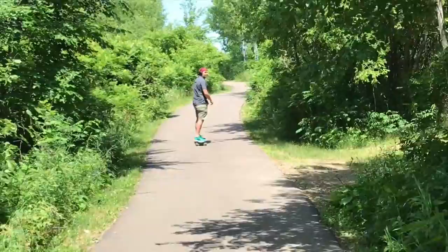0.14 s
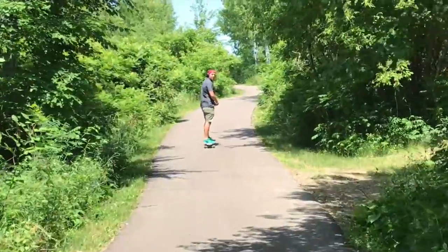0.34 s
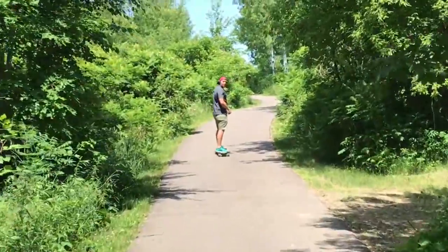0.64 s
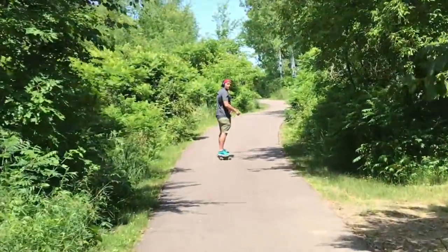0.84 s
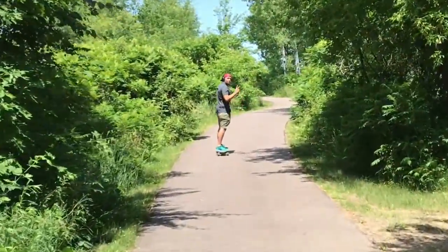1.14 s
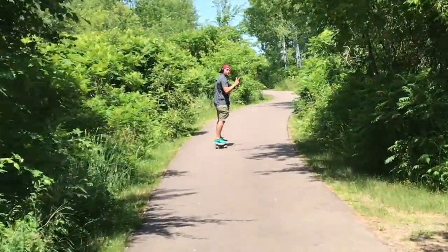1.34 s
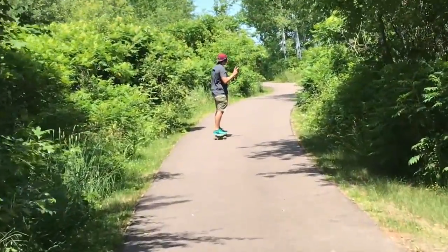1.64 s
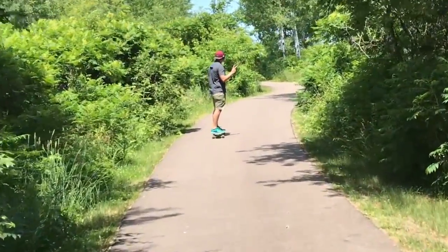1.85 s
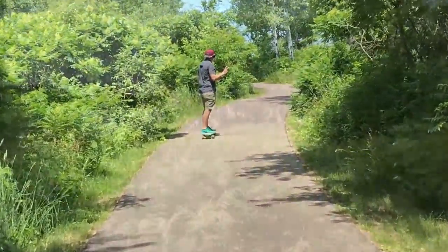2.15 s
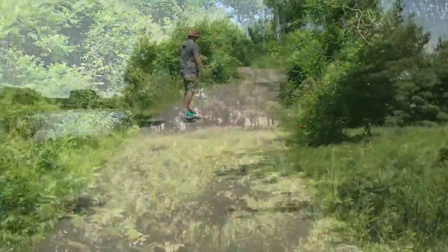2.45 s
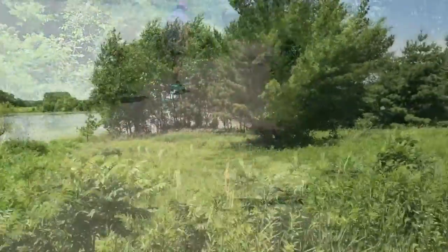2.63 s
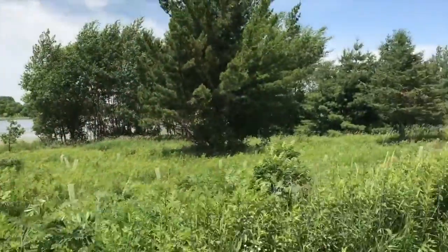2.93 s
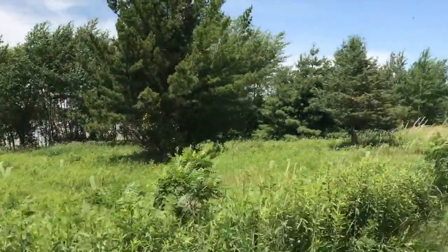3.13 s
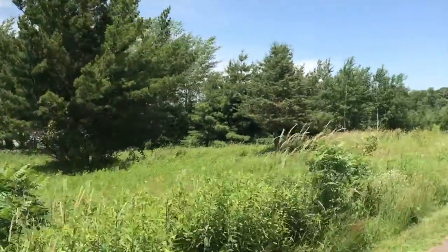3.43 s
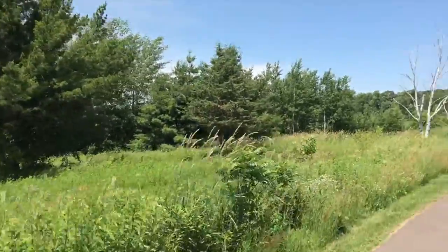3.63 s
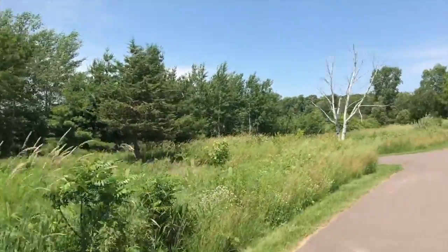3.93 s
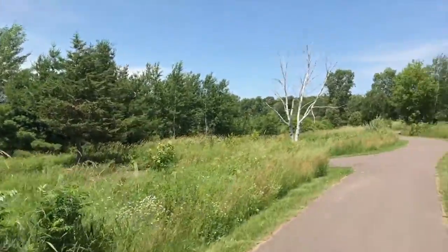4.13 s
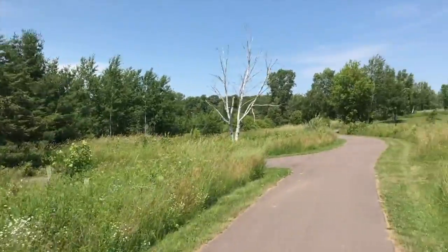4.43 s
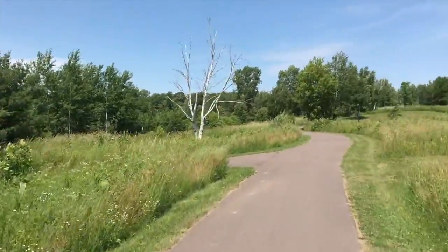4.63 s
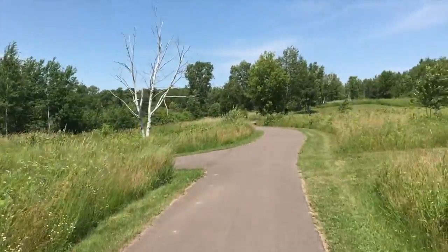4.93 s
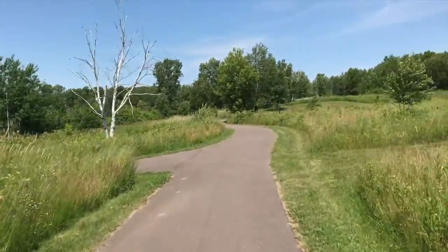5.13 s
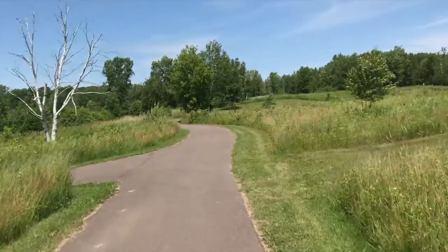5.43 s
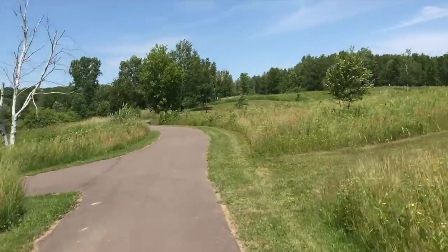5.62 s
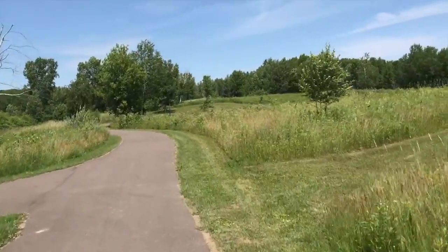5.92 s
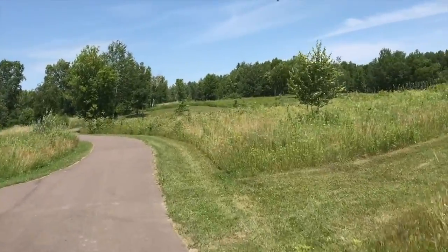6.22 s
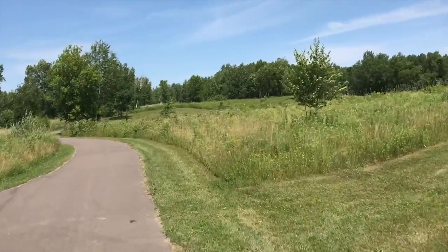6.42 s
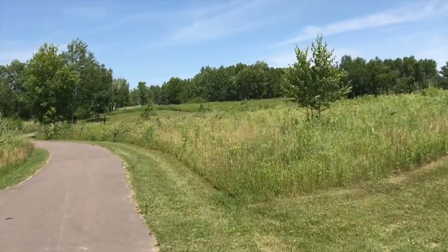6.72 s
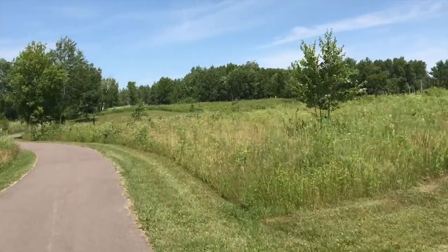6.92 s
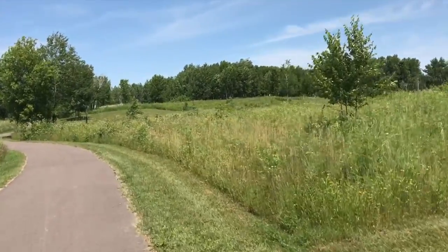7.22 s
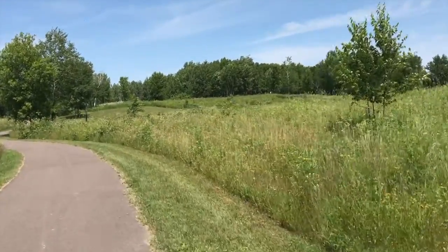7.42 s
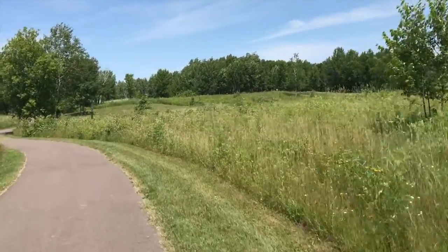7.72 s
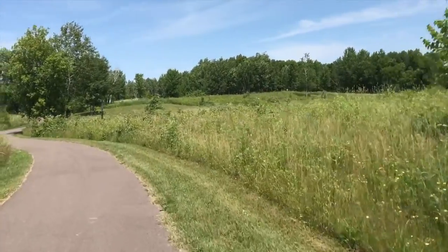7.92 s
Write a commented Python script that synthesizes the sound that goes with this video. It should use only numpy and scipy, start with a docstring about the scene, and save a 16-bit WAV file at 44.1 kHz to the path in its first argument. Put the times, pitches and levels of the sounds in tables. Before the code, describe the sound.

Close handheld microphone over a rolling longboard in an open park. Strong woody rumble and low wind flutter come first, with small dull knocks. The roll then softens, wind breaks into short puffs and fades, and small birds whistle and trill high and faint. A sharp double knock around the middle leads into crunching grit, then calm steady rolling.

```python
"""An asphalt park path, heard from the hand of a rider rolling along it on a longboard.
Forced vibration: the rough road drums on the resonant deck, and both axles knock over a crack.
Fracture and turbulence: grit crackles under the wheels; wind buffets the microphone, mostly early on.
Frequency modulation: small birds in the meadow twitter in gliding near-sine notes with echoes."""
import sys
import numpy as np
from scipy import signal
from scipy.fft import rfft, irfft
from scipy.io import wavfile

SR = 44100
rng = np.random.default_rng(int(sys.argv[2]) if len(sys.argv) > 2 else 0)


def inscribe(sig):
    """Save sig as 16-bit PCM at rate SR to the path in sys.argv[1].

    A 1-D sig is mono; a 2-D sig holds one channel per row.
    Samples are clipped to [-1, 1] before scaling.
    """
    pcm = np.round(np.clip(np.atleast_2d(sig).T, -1, 1) * 32767)
    wavfile.write(sys.argv[1], SR, pcm.astype(np.int16))


N = 355534  # length [samples]


def from_db(db):
    """Logarithmic level: decibels to amplitude gain."""
    return 10 ** (np.asarray(db) / 20)


def rms_one(x):
    """Normalization: scale to unit rms."""
    return x / np.sqrt(np.mean(x ** 2) + 1e-20)


def in_time(rows):
    """Linear interpolation: each column of a curve at every sample."""
    s, *columns = np.transpose(rows)
    return [np.interp(np.arange(N) / SR, s, column) for column in columns]


def drift(rate_hz):
    """Low-pass random process: slow fluctuation of rms 1."""
    hz = np.arange(N // 2 + 1) * SR / N
    spectrum = rfft(rng.standard_normal(N)) / (1 + (hz / rate_hz) ** 2)
    return rms_one(irfft(spectrum, N))


def noise(colour):
    """Spectral shaping: white noise weighted along log frequency, rms 1."""
    hz, level_db = np.transpose(colour)
    bins = np.arange(1, N // 2 + 2) * SR / N
    weight = from_db(np.interp(np.log(bins), np.log(hz), level_db))
    return rms_one(irfft(rfft(rng.standard_normal(N)) * weight, N))


def resonate(x, hz, width):
    """Damped resonance: a two-pole band-pass with gain 1 at its peak."""
    r = np.exp(-np.pi * width / SR)
    feedback = [1, -2 * r * np.cos(2 * np.pi * hz / SR), r * r]
    return signal.lfilter(np.array([1, 0, -1]) * (1 - r * r) / 2, feedback, x + 1e-18)


def ring(clicks, hz, t60):
    """Impulse response: a unit click starts a decaying sine of initial height 1."""
    r, w = np.exp(-np.log(1000) / (t60 * SR)), 2 * np.pi * hz / SR
    return signal.lfilter([0, np.sin(w)], [1, -2 * r * np.cos(w), r * r], clicks + 1e-18)


def clicks_at(times, sizes):
    """Impulsive excitation: single impulses at given moments."""
    return np.bincount((np.asarray(times) * SR).astype(int), sizes, N)[:N]


def grains(per_s, spread_db):
    """Shot noise: random impulses, many small and a few large; rms 1."""
    height_db = spread_db * np.minimum(rng.exponential(1, N), 4)
    sizes = from_db(height_db) * rng.choice([-1, 1], N)
    return rms_one(sizes * (rng.random(N) < per_s / SR))


def scatter(x, decay_s):
    """Diffuse response: each impulse spreads into a dense, dying cluster of the same energy."""
    age = np.arange(SR // 4) / SR
    cluster = rng.standard_normal(len(age)) * np.exp(-age / decay_s)
    return signal.fftconvolve(x, cluster / np.linalg.norm(cluster))[:N]


def swell(middle_s, length_s):
    """Amplitude envelope: a cosine-squared rise and fall of height 1."""
    return np.cos(np.pi * np.clip((np.arange(N) / SR - middle_s) / length_s, -.5, .5)) ** 2


def swells(rows):
    """Superposition: the summed gain of a row of passing swells."""
    return sum(from_db(db) * swell(s, length) for s, length, db in rows)


# the ride: (time [s], relative deck rumble [dB], relative low bending of the deck [dB])
RIDE_LEVELS = [(0, -36, -52), (1.1, -36, -34), (1.7, -37, -37.5), (2.1, -35.5, -34.5), (2.4, -40.5, -43),
               (2.65, -43.5, -39.5), (2.9, -46, -43), (3.5, -46, -48.5), (4.1, -43, -40.5),
               (4.6, -43.5, -41.5), (5.3, -44.5, -38), (6.1, -45.5, -43), (6.7, -45.5, -41),
               (8.06, -45, -41.5)]


def ride():
    """Varying excitation: deck rumble and low bending levels along the path."""
    return in_time(RIDE_LEVELS)


def drum(modes):
    """Forced vibration: stones in the asphalt keep a set of resonances ringing."""
    drumming = np.zeros(N)
    for hz, width, db in modes:
        stones = grains(per_s=1800, spread_db=2.0)
        drumming += from_db(db) * rms_one(resonate(resonate(stones, hz, width), hz, width))
    return drumming


# resonances of deck and wheels: (frequency [Hz], width of each filter pass [Hz], relative level [dB])
DECK_MODES = [(494, 100, -5.5), (585, 140, -8), (746, 88, -20), (934, 423, -12), (1115, 300, -20)]
# low bending of the deck: (frequency [Hz], width of each filter pass [Hz], relative level [dB])
LOW_BENDING_MODES = [(159, 40, -7), (202.4, 90, -2), (277, 92, -3), (325.3, 47, -10)]
# sizzle of the tread: (frequency [Hz], relative density [dB per Hz])
TREAD_SPECTRUM = [(700, -26), (1250, -2.5), (1800, -8), (3000, -5), (4500, -10.5), (7000, -8),
                  (10000, -20.5)]
TREAD_DB = -20.5  # against the deck rumble


def rolling(deck_db, bending_db):
    """Modal excitation: the road drums on the deck and the tread sizzles; rough patches shake all of it."""
    patches = from_db(2.5 + 1.4 * drift(30))
    upper = drum(DECK_MODES) + from_db(TREAD_DB) * noise(TREAD_SPECTRUM)
    bending = from_db(bending_db) * drum(LOW_BENDING_MODES)
    return patches * (bending + from_db(deck_db) * upper)


# patches of sand under the wheels: (middle [s], length [s], relative level [dB])
SAND_PATCHES = [(1.09, 0.095, -53), (1.98, 0.4, -61), (3.44, 0.23, -80), (4.22, 0.62, -62),
                (4.72, 0.21, -53), (4.87, .22, -53.5), (5.01, 0.15, -54), (5.22, 0.27, -52.5),
                (5.34, 0.19, -54), (5.5, 0.42, -57.5), (7.25, 0.52, -65), (7.65, 0.076, -58),
                (8.03, 1, -65)]


def loose_sand():
    """Varying excitation: gain of the loose sand passing under the wheels."""
    return swells(SAND_PATCHES)


# smooth hiss: (frequency [Hz], relative density [dB per Hz])
HISS_SPECTRUM = [(600, -14), (1300, 1.5), (1700, 8.5), (2300, 10), (3000, 5.5), (4000, 9), (5000, 5),
                 (6500, 3.5), (9000, -2), (10450, -5), (11300, -3), (14500, -11), (16000, -20)]
# level at cruising rumble, its share of the rumble's swing in dB, hiss of sand against the sand gain
HISS_DB, HISS_FOLLOWS, SAND_HISS_DB = -58, 0.21, -4.5


def hiss(effort_db, sand):
    """Broadband friction: tyre and leaf hiss grows with the rumble; loose sand adds a little power."""
    clean_path = from_db(HISS_DB + HISS_FOLLOWS * effort_db)
    return np.hypot(clean_path, from_db(SAND_HISS_DB) * sand) * noise(HISS_SPECTRUM)


# ring of a grain: (frequency [Hz], width before damping [Hz], relative level [dB])
GRAIN_MODES = [(5960, 1900, 0), (7980, 570, 4.5), (8900, 1160, -3), (11440, 700, -5), (12940, 620, 1),
               (14200, 690, -1.5), (15800, 800, -3.5)]


def grain_ring(clicks, damping=1):
    """Damped resonance: the short, bright ring of crushed grit; damping widens its modes."""
    bright = sum(from_db(db) * resonate(clicks, hz, width * damping) for hz, width, db in GRAIN_MODES)
    return signal.sosfilt(signal.butter(4, 5600, "high", fs=SR, output="sos"), bright)


# larger grains of grit snapping: (time [s], relative strength [dB])
GRAIN_SNAPS = [(0.269, -16.5), (1.134, -20), (1.468, -19), (1.6317, -21), (2.42, -19.5), (2.993, -20.5),
               (3.032, -23), (3.16, -28), (3.389, -25), (3.4, -24), (3.426, -22), (3.473, -23),
               (3.568, -20.5), (4.085, -19), (4.21, -21), (4.2368, -17), (4.274, -23), (4.342, -17),
               (4.37, -25), (4.6474, -18), (4.8135, -22), (4.842, -13.5), (4.8855, -16), (4.92, -17.5),
               (4.9716, -18.5), (5.019, -16), (5.043, -17), (5.1014, -16), (5.191, -18.5), (5.48, -18),
               (5.9626, -21), (6.351, -21), (7.0953, -19.5), (7.15, -24), (7.277, -19.5), (7.634, -26),
               (7.666, -16.5), (8.0092, -18.5)]
GRIT_DB, GRIT_FOLLOWS = -64.5, 0.43  # gain at cruising rumble, share of the rumble's swing in dB
SAND_CLUMP_DB = -7  # how much of the loose sand is crushed in clumps


def grit(effort_db, sand_gain, bed_db=-5, fine_db=-2, crumble_db=-4):
    """Brittle fracture: grit crackles in clumps, sand fizzes finely, large grains and crack edges snap."""
    # each clump is crushed at once and crumbles away, over a bed of fine dust
    blows = np.abs(grains(per_s=120, spread_db=2.8))
    crush = signal.lfilter([1], [1, -np.exp(-1 / (.003 * SR))], blows)  # 3 ms decay
    clumps = rms_one(grain_ring(grains(per_s=2500, spread_db=4.0) * crush, damping=1.3))
    dust = rms_one(grain_ring(grains(per_s=2800, spread_db=1.5), damping=2.7))
    fine = rms_one(grain_ring(grains(per_s=2700, spread_db=6.5)))
    sand = from_db(fine_db) * fine + from_db(SAND_CLUMP_DB) * clumps
    s, snap_db = np.transpose(GRAIN_SNAPS)
    snaps = clicks_at(s, from_db(snap_db - 3.0))
    crumbs = from_db(crumble_db) * scatter(snaps, decay_s=0.0061)
    knock_s, knock_db, edge_db, _ = wheel_strikes()
    edges = scatter(clicks_at(knock_s, from_db(knock_db + edge_db - 3.0)), decay_s=0.012)
    road_gain = from_db(GRIT_DB + GRIT_FOLLOWS * effort_db)
    crackle = road_gain * (clumps + from_db(bed_db) * dust) + sand_gain * sand
    return crackle + grain_ring(snaps + crumbs + edges, damping=0.97)


# steady air stream on the microphone: (time [s], deep rumble [dB], flutter [dB])
AIR_STREAM = [(0, -27, -26), (1.3, -28, -30.5), (1.9, -33, -29.5), (2.5, -32.5, -27.5), (3.0, -45, -27),
              (3.3, -40, -30), (3.55, -28, -26.5), (3.7, -38.5, -45), (3.9, -48.5, -50), (4.4, -39, -77),
              (5.3, -51.5, -55), (6.1, -44.5, -66), (8.06, -52, -46.5)]
# gusts on top of it: (middle [s], length [s], level [dB])
GUST_SWELLS = [(1.1, 0.39, -42), (2.12, 0.17, -21.5), (5.02, 0.3, -39.5)]
# deep rumble: (frequency [Hz], relative density [dB per Hz])
RUMBLE_SPECTRUM = [(15, -40), (28, 4), (42, -0.5), (60, 5), (80, 1.5), (110, -5.5), (200, -79), (500, -56),
                   (1200, -81)]
# quicker flutter: (frequency [Hz], relative density [dB per Hz])
FLUTTER_SPECTRUM = [(30, -54), (55, 0), (82, 1), (125, 2), (190, -7), (290, -7), (420, -15), (600, -21.5),
                    (900, -50), (2000, -79)]
# strongest eddies: (middle [s], length [s], mean pitch before swirl [Hz], glide [octaves], peak level [dB])
EDDIES = [(.951, 0.023, 101, 0, -13.5), (1.026, 0.009, 213, -0.62, -9), (1.045, 0.071, 69, -0.013, -17.5),
          (1.083, 0.024, 83, 0.048, -14.5), (1.156, 0.025, 84, -0.074, -16), (2.773, 0.023, 166, 0.31, -18),
          (2.869, 0.028, 115, -0.029, -16.5), (3.02, 0.047, 112, 0.18, -17), (3.042, .05, 184, 0.53, -18.5),
          (3.086, .05, 218, 0.041, -24), (3.136, 0.037, 114, 0.21, -21), (3.18, .04, 181.5, -0.47, -16.5),
          (3.198, .03, 123, -0.19, -18.5), (3.356, 0.027, 130, -0.4, -18), (3.412, .018, 139, -0.43, -13),
          (3.453, .03, 284, -0.16, -21), (3.522, 0.028, 127, 0.12, -19.5), (3.542, 0.06, 66, 0, -24),
          (3.549, 0.021, 258, 0.31, -18.5), (3.719, 0.017, 141, 0.24, -18), (3.819, .04, 182.4, -0.12, -26),
          (4.605, 0.064, 61, 0.12, -28), (4.728, 0.068, 157, -0.25, -28.5), (4.795, 0.055, 73, 0.075, -25)]
GUST_FLUTTER_DB = -21  # flutter in a gust, against its rumble


def wind():
    """Turbulent pressure: eddies rumble and flutter, rise in gusts, and buffet in a few swings each."""
    rumble_db, flutter_db = in_time(AIR_STREAM)
    gusts = swells(GUST_SWELLS)
    rumble = np.hypot(from_db(rumble_db), gusts) * noise(RUMBLE_SPECTRUM)
    unsteady = rms_one(noise(FLUTTER_SPECTRUM) * from_db(2.0 * drift(21)))
    flutter = np.hypot(from_db(flutter_db), from_db(GUST_FLUTTER_DB) * gusts) * unsteady
    buffets, swirl = np.zeros(N), drift(115)
    for s, length, hz, glide, db in EDDIES:
        at = int((s - length / 2) * SR) + np.arange(int(length * SR))
        octaves = glide * np.linspace(-.5, .5, len(at)) + 0.36 * swirl[at]
        turns = np.cumsum(hz * 2 ** octaves) / SR + rng.random()
        buffets[at] += from_db(db) * np.hanning(len(at)) * np.sin(2 * np.pi * turns)
    return rumble + flutter + buffets


# an axle crosses a crack or bump: (time [s], relative strength [dB], sharp edge [dB], low thump [dB],
# lag of its other wheel [s], that wheel against the first [dB])
AXLE_KNOCKS = [(0.077, -21.5, -9, 2, 0.0075, -5), (.443, -37, -25, 0, 0.0089, -12),
               (.594, -24.5, -27, 15.5, 0.0078, -14), (.971, -24, -25, -4, 0.0091, -18),
               (1.011, -18, -28, 1.5, .006, -23), (1.095, -20, -12, -9, .006, -12),
               (1.217, -32, -20, -9, 0.014, -1), (2.77, -38, -25, 16, .008, -5),
               (3.068, -35, -28, 0, .008, -10), (3.405, -27.5, -20, 0, .008, -16),
               (3.637, -36, -25, -7, .008, -12), (3.757, -26, -25, 4, 0.0075, -4),
               (4.5183, -4, 0.5, 1, .012, -6.5), (4.6894, -10.5, -15, 3, 0.0067, -3.5),
               (5.531, -31, -25, 2, 0.01, -2), (6.228, -32, -28, -1, 0.011, -4),
               (6.351, -30.5, -15, -2, 0.0095, -4)]


def wheel_strikes():
    """Successive impacts: both wheels of an axle meet the crack; times, dB, edge dB, thump dB."""
    s, db, edge_db, thump_db, lag, other_db = np.transpose(AXLE_KNOCKS)
    return np.r_[s, s + lag], np.r_[db, db + other_db], np.tile(edge_db, 2), np.tile(thump_db, 2)


# ring of the struck board: (frequency [Hz], relative level [dB], decay time T60 [s])
BOARD_MODES = [(138, -13, 0.16), (212, -9, 0.35), (342, -0.5, 0.05), (438, -9.5, 0.15), (522, -2.5, 0.1),
               (603, -5, 0.095), (712, -6.5, 0.1), (902, -8.5, 0.06), (1013, -0.5, 0.029),
               (1225, -5.5, 0.011), (1964, -29.5, 0.017), (2190, -23, 0.025), (2550, -25, 0.0027),
               (3130, -16.5, 0.015)]
# chatter of the loose trucks: (frequency [Hz], width of each filter pass [Hz], relative level [dB])
TRUCK_MODES = [(318, 220, 22.5), (540, 410, 9), (938, 680, 14.5), (2030, 1100, 8)]
RATTLE_S, THUMP_BELOW_HZ = 0.011, 400  # decay of the chatter's excitation; thump acts on lower modes


def knocks(uneven_db=2, board_db=-11.0):
    """Modal impact: each wheel strikes every mode unequally; trucks and bearings rattle on briefly."""
    s, level_db, _, thump_db = wheel_strikes()

    def blows(hz, db):
        """Impulsive excitation: the blows as one mode receives them."""
        uneven = uneven_db * rng.standard_normal(len(s))
        return clicks_at(s, from_db(level_db + db + thump_db * (hz < THUMP_BELOW_HZ) + uneven))

    board, rattle = np.zeros(N), np.zeros(N)
    for k, (hz, db, t60) in enumerate(BOARD_MODES):
        board += ring(blows(hz, db), hz, t60) * (-1) ** k  # neighbouring modes in opposite phase
    for hz, width, db in TRUCK_MODES:
        chatter = scatter(blows(hz, db), RATTLE_S)
        rattle += resonate(resonate(chatter, hz, width), hz, width)
    return from_db(board_db) * board + rattle


# short sliding chips, most of them falling:
# (start [s], length [s], middle pitch [Hz], slide [Hz], relative level [dB])
CHIP_NOTES = [(1.836, 0.024, 4150, -700, -45), (1.921, 0.028, 3980, 300, -47),
              (2.021, .011, 4550, -500, -45), (2.028, 0.015, 3950, -150, -41),
              (2.11, 0.018, 3960, 200, -47), (2.202, 0.02, 4600, -100, -44), (2.21, .015, 4000, -600, -46),
              (2.302, 0.016, 4000, 300, -46), (2.432, .016, 5200, -400, -47),
              (2.829, .011, 4640, -600, -46), (2.843, .02, 4660, -550, -38), (2.863, .01, 3850, -600, -46),
              (2.886, 0.013, 4550, 300, -42), (2.898, 0.013, 4580, -600, -37),
              (2.911, .012, 3850, -450, -44), (3.92, .02, 4280, 1000, -48), (4.002, 0.028, 3700, 0, -43),
              (4.579, 0.015, 4130, 600, -37.5), (4.985, .02, 3430, -100, -49),
              (5.938, .024, 4450, -400, -48), (6, .024, 4350, -700, -45), (6.058, .013, 3820, -550, -41.5),
              (6.122, 0.012, 3880, -650, -40), (6.645, .016, 4070, -600, -47),
              (7.242, .014, 4200, -700, -43), (7.274, .01, 4250, -500, -43), (7.286, .016, 4700, -800, -48),
              (7.3, .015, 4220, -1000, -41)]


def chips():
    """Linear frequency sweep: sliding chips, each as (s, pitch contour, gain)."""
    for s, length, hz, slide, db in CHIP_NOTES:
        yield s, hz + slide * np.linspace(-.5, .5, int(length * SR)), from_db(db)


# arched whistles: (start [s], length [s], starting pitch [Hz], top pitch [Hz], end pitch [Hz],
# relative level [dB], fade from start to end [dB])
WHISTLE_NOTES = [(2.97, 0.03, 4440, 4700, 4180, -42, 0), (3.102, .055, 5030, 5200, 5000, -53, -3),
                 (3.426, 0.06, 4500, 4750, 4370, -43, 2), (4.107, 0.083, 4080, 4840, 3400, -38, -6),
                 (4.26, .089, 3990, 4790, 3350, -36.5, -4), (4.484, 0.052, 3200, 3570, 3270, -46, 0),
                 (4.77, .088, 4070, 4620, 3480, -43, -7), (4.915, .074, 4020, 4700, 3580, -42, -7),
                 (5.128, 0.065, 3350, 3550, 3350, -53, -2)]
# when the rise starts, peaks and flattens out, as shares of the length
WHISTLE_RISE, WHISTLE_TOP, WHISTLE_TAIL = 0.097, 0.55, 0.96
WHISTLE_TOP_DB = -13  # the voice thins on the very top of an arch


def whistles():
    """Frequency modulation: pitch arches up and back, each note as (s, pitch contour, gain)."""
    for s, length, start, top, end, db, fade_db in WHISTLE_NOTES:
        along = np.linspace(0, 1, int(length * SR))
        phase = np.interp(along, [WHISTLE_RISE, WHISTLE_TOP, WHISTLE_TAIL], [0, .5, 1])
        arch = np.sin(np.pi * phase) ** 2
        foot = np.where(along < WHISTLE_TOP, start, end)
        level_db = db + WHISTLE_TOP_DB * arch ** 10 + fade_db * (along - .5)
        yield s, foot + (top - foot) * arch, from_db(level_db)


# buzzy trills: (start [s], length [s], time from stroke to stroke [s], mean pitch [Hz], relative level [dB])
TRILL_NOTES = [(3.277, 0.045, .0115, 4170, -45.5), (3.343, .034, .0135, 4010, -46),
               (3.976, .021, .014, 4400, -45), (4.023, .045, 0.012, 4200, -41.5),
               (4.192, .037, .015, 4150, -46), (4.57, .052, .015, 4170, -43.5),
               (4.642, .042, .012, 4040, -41), (5.232, 0.039, 0.013, 4150, -51),
               (5.303, .029, 0.0094, 4100, -46.5), (5.358, .042, .012, 3980, -45),
               (5.426, .046, 0.0127, 3900, -44.5), (6.029, 0.058, .0135, 3960, -47),
               (6.104, 0.053, .011, 3950, -50), (6.662, 0.079, .009, 4400, -53),
               (7.026, 0.063, 0.0096, 4060, -49), (7.094, .058, 0.012, 3950, -49),
               (7.357, 0.032, .0115, 4250, -47)]
STROKE_S, STROKE_FALL_HZ, TRILL_SAG_HZ = 0.0126, 930, 202  # stroke length and fall; sinking of the run


def trills(stray_s=.0015, stray_hz=150, stray_db=0.5):
    """Repeated frequency sweeps: quick falling strokes in a sinking run, as (s, pitch contour, gain)."""
    fall = STROKE_FALL_HZ * np.linspace(-.5, .5, int(STROKE_S * SR))
    for s, length, gap, hz, db in TRILL_NOTES:
        strays = rng.standard_normal(size=(20, 3))
        for age, (late, high, loud) in zip(np.arange(0, length, gap), strays):
            middle = hz + stray_hz * high - TRILL_SAG_HZ * (age / length - .5)
            yield s + age + stray_s * late, middle - fall, from_db(db + stray_db * loud)


BIRD_ECHO_S, BIRD_ECHO_DB = 0.019, -14.5  # one distinct echo off the trees


def birds(waver_hz=40, flutter_db=1.0):
    """Phase accumulation and reflection: wavering near-sine notes, echoed by foliage and trees."""
    song, waver, flutter = np.zeros(N), drift(120), drift(65)
    for s, pitch, gain in [*chips(), *whistles(), *trills()]:
        at = int(s * SR) + np.arange(len(pitch))
        envelope = signal.windows.tukey(len(at), .3) * from_db(flutter_db * flutter[at])
        turns = np.cumsum(pitch + waver_hz * waver[at]) / SR
        song[at] += gain * envelope * np.sin(2 * np.pi * turns)
    foliage = from_db(-12) * scatter(song, decay_s=0.003) + from_db(-8) * scatter(song, decay_s=0.018)
    off_trees = from_db(BIRD_ECHO_DB) * np.r_[np.zeros(int(BIRD_ECHO_S * SR)), song][:N]
    return from_db(-7.5) * (song + foliage + off_trees)


# colour of the swish: (frequency [Hz], relative density [dB per Hz])
SWISH_SPECTRUM = [(1000, -4), (1750, -1), (2050, -9), (2500, 0), (2900, -12), (3600, -41)]
SWISH_S, SWISH_LENGTH_S, SWISH_DB = 2.42, 0.6, -50.5  # middle, length, peak level


def swish():
    """Amplitude-modulated noise: a brief, soft swish swells and fades."""
    return from_db(SWISH_DB) * swell(SWISH_S, SWISH_LENGTH_S) * noise(SWISH_SPECTRUM)


CRUISE_DB = -46  # deck rumble at which hiss and grit have their stated levels


def scene():
    """Superposition: board, air and birds add up at one microphone."""
    deck_db, bending_db = ride()
    effort_db, sand = deck_db - CRUISE_DB, loose_sand()
    road = rolling(deck_db, bending_db) + hiss(effort_db, sand) + grit(effort_db, sand)
    return (road + wind() + knocks() + birds() + swish())[None]


CUTOFF_HZ = 15850


def record(dry):
    """Band limitation: the microphone sheds the deepest rumble; the top is cut steeply."""
    lean = signal.sosfilt(signal.butter(6, 34, "high", fs=SR, output="sos"), dry)
    return signal.sosfilt(signal.ellip(12, .1, 90, CUTOFF_HZ, fs=SR, output="sos"), lean)


dry = scene()
out = record(dry)
inscribe(out)
```